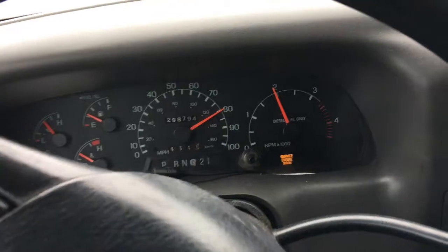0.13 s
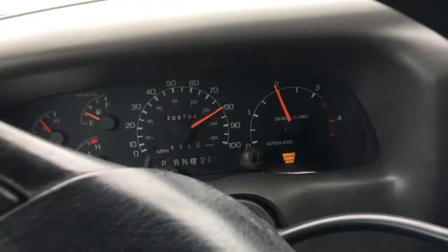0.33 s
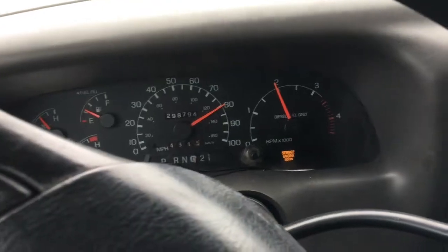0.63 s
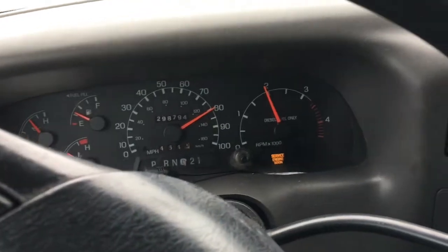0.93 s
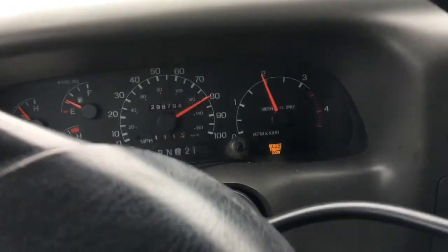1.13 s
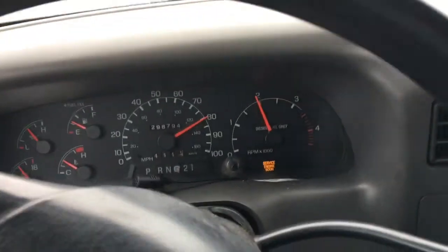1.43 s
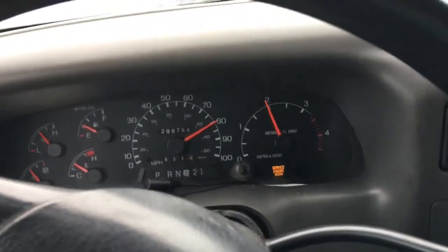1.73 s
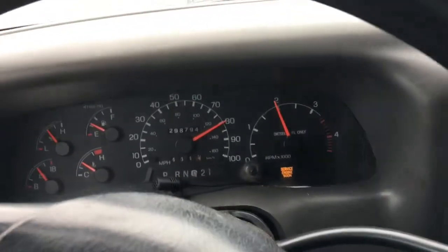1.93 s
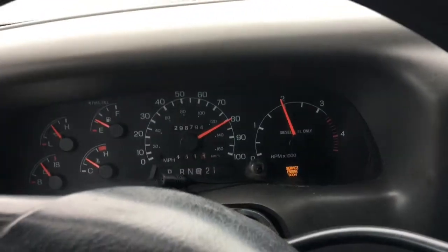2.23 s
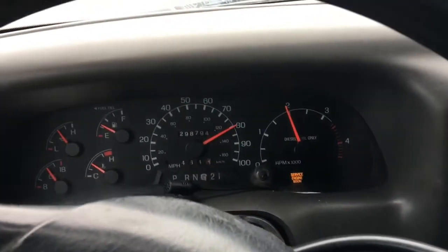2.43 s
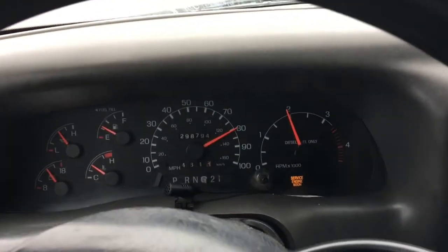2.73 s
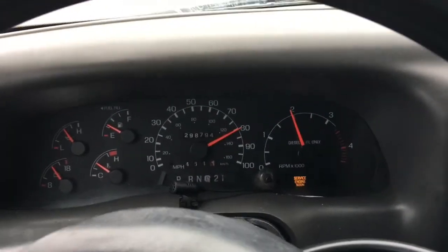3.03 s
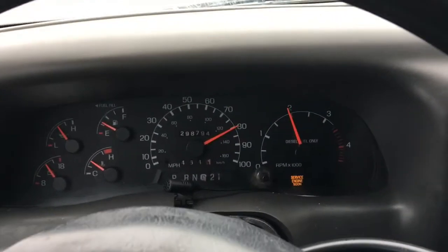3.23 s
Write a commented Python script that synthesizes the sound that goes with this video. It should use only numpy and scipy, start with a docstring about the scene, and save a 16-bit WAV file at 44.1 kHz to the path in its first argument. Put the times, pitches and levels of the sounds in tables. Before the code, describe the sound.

Turbocharger surge flutters in quick hooting puffs over steady diesel engine and road roar in a cab

```python
"""Inside the cab of a diesel pickup at highway speed, heard by a small microphone near the dashboard.
After a short silence the level opens on engine and wheel tones over road roar, all sums of tones and shaped
noise; the intake hisses (noise) with a thin compressor whistle (a narrow noise band). After two seconds the
hiss weakens, the whistle swells and climbs, and load lifts the firing tone. Then the compressor surges:
puffs of noise flow back through the intake pipe, which hoots on a wandering tone and its octave."""
import sys
import numpy as np
from scipy import signal
from scipy.fft import rfft, irfft
from scipy.io import wavfile

SR = 44100
rng = np.random.default_rng(int(sys.argv[2]) if len(sys.argv) > 2 else 0)


def wav_record(signal):
    """Record a signal, one row per channel, as 16-bit PCM in the file named by sys.argv[1]."""
    frames = np.transpose(np.atleast_2d(signal))
    bounded = np.clip(frames, -1, 1)
    # unit amplitude maps onto the largest positive 16-bit level
    quanta = np.round(bounded * 32767).astype(np.int16)
    wavfile.write(sys.argv[1], SR, quanta)


def makeup_ratio(level_db):
    """Linear amplitude ratio for a level in decibels (20 dB per factor of ten)."""
    decades = np.asarray(level_db, float) / 20
    return 10 ** decades


N = 148617
TIME = np.arange(N) / SR
WHEEL_HZ = 12.388  # turns per second


def rms_one(x):
    """Scales a signal to rms 1."""
    return x / np.sqrt(np.mean(x ** 2) + 1e-20)


def in_time(rows):
    """Straight-line curves through the columns of a table whose first column is time."""
    s, *columns = np.transpose(rows)
    return [np.interp(TIME, s, c) for c in columns]


def drift(rate_hz):
    """Slow random wandering of spread 1: noise through two equal low-pass poles at rate_hz."""
    hop = 40  # samples between drawn values
    r = np.exp(-2 * hop * np.pi * rate_hz / SR)
    white = rng.standard_normal(N // hop + 2002)
    slow = signal.lfilter([1], [1, -2 * r, r * r], white)[2000:]  # drops the filter's start
    return np.interp(np.arange(N) / hop, np.arange(len(slow)), rms_one(slow - slow.mean()))


def coloured(spectrum):
    """Noise of rms 1 whose spectrum follows the table, joined along log frequency."""
    hz, db = np.transpose(spectrum)
    bins = np.maximum(np.fft.rfftfreq(N, 1 / SR), 1)
    gain = makeup_ratio(np.interp(np.log(bins), np.log(hz), db))
    return rms_one(irfft(rfft(rng.standard_normal(N)) * gain, N))


def narrow(cycles, pole_width_hz):
    """Noise band of rms 1 around a moving tone: two equal poles shape it, the tone's phase shifts it up."""
    r = np.exp(-np.pi * pole_width_hz / SR)
    white = rng.standard_normal(N) + 1j * rng.standard_normal(N)
    band = signal.lfilter([1], [1, -2 * r, r * r], white)
    return rms_one(np.real(band * np.exp(2j * np.pi * cycles)))


def rings(table):
    """Resonances as narrow bands of noise at fixed pitches."""
    return sum(makeup_ratio(db) * narrow(hz * TIME, width) for hz, width, db in table)


def tones(cycles, orders, waver_db, waver_rad):
    """Multiples of a turning rate, in step like a train of pushes: one shared phase sway, separate levels."""
    sway = waver_rad * drift(1.25) + rng.uniform(0, 2 * np.pi)
    parts = []
    for multiple, db in orders:
        level = np.sqrt(2) * makeup_ratio(db + waver_db * drift(1.6))
        parts.append(level * np.cos(multiple * (2 * np.pi * cycles + sway)))
    return parts


def wheels():
    """The turning wheels push the cab at multiples of their rate."""
    # tones of the turning wheels: (multiple of the wheel rate, level [dB rms])
    wheel_orders = [(3, -35.0), (4, -25.5), (6, -25.0), (7, -24.5), (15, -40.0), (16, -43.0), (17, -45.0),
                    (18, -47.0), (19, -49.0), (23, -50.0)]
    return sum(tones(WHEEL_HZ * TIME, wheel_orders, waver_db=2.1, waver_rad=0.055))


def road_roar():
    """Broad road and wind noise: the bass is lumpy, the rest flickers faster."""
    # colour of the roar in the cab: (frequency [Hz], relative level [dB per Hz])
    roar_colour = [(15, -36), (27, -31), (38, -10), (52, -2), (66, 0), (90, -7), (110, -6), (135, -3.5),
                   (180, -12), (250, -19.5), (340, -18.5), (480, -25.5), (600, -20.5), (770, -26.5),
                   (1230, -31), (1800, -33), (2400, -36.5), (3300, -41.5), (4200, -43), (5500, -41.5),
                   (7000, -44.5), (9000, -46), (11000, -52.5), (14000, -45.5), (16000, -40)]
    level_db, rumble_below_hz, lump_db, flicker_db = -18.5, 160, 1, 0.63
    roar = coloured(roar_colour)
    low_pass = signal.butter(2, rumble_below_hz, fs=SR, output="sos")
    bass = signal.sosfiltfilt(low_pass, roar)
    lumpy_bass = bass * makeup_ratio(lump_db * drift(2.7))
    flickering_rest = (roar - bass) * makeup_ratio(flicker_db * drift(12.0))
    return makeup_ratio(level_db) * (lumpy_bass + flickering_rest)


def drones():
    """Narrow noise bands, perhaps tyre tread and panels, and a tone that throbs once per wheel turn."""
    # noisy drones: (frequency [Hz], pole width [Hz], level [dB rms])
    drone_bands = [(659, 32, -39), (614, 28, -43.5), (847, 30, -47), (1258, 30, -56), (1628, 18, -52.5),
                   (2022, 34, -49.5), (2333, 46, -50.5), (2536, 45, -51), (3263, 64, -52.5)]
    # tone at the heart of the loudest drone: (frequency [Hz], pitch wander [Hz], mid-throb level [dB rms])
    hz, wander_hz, core_db = (657, 8.1, -35)
    throb_db = 4.5 * np.sin(2 * np.pi * WHEEL_HZ * TIME)
    cycles = np.cumsum(hz + wander_hz * drift(10.66)) / SR
    core = np.sqrt(2) * makeup_ratio(core_db + throb_db) * np.sin(2 * np.pi * cycles)
    return core + rings(drone_bands)


def engine(cycles, load_db):
    """Low orders of the eight-cylinder cycle; the firing tone grows with load."""
    # tones of the engine: (multiple of the cycle rate, level before load [dB rms])
    engine_orders = [(4, -20.5), (6, -24.5), (8, -24.5), (12, -43.0), (14, -47.0), (17, -50.0), (18, -42.0)]
    firing_order = 8
    parts = tones(cycles, engine_orders, waver_db=-0.1, waver_rad=0.067)
    mix = 0
    for part, (multiple, _) in zip(parts, engine_orders):
        mix = mix + (part * makeup_ratio(load_db) if multiple == firing_order else part)
    return mix


def intake_hiss(cycles):
    """Air drawn in hisses, swelling once per engine cycle and at random."""
    # strength of the hiss: (time [s], level [dB])
    hiss_curve = [(0, -37.5), (.45, -36), (.8, -35.5), (1.4, -35.5), (1.9, -35.5), (2.15, -37), (2.22, -41),
                  (2.4, -44.5), (3.37, -47.5)]
    # colour of the hiss: (frequency [Hz], relative level [dB])
    hiss_colour = [(1800, -20), (3000, -7), (3600, -9), (4300, -6.5), (4800, -6), (5800, -4), (6600, -1),
                   (7700, -3.5), (8900, 1), (10000, -6.5), (10800, -6.5), (12000, -4.5), (13000, -7),
                   (14500, -2), (15100, -5), (15700, -10), (16500, -14)]
    # faint intake resonances: (frequency [Hz], pole width [Hz], level over the hiss level [dB])
    intake_rings = [(4324, 31, -18.5), (5770, 55, -14), (6030, 48, -17), (7140, 64, -13.5), (8350, 50, -24),
                    (8700, 76, -15), (9700, 40, -17), (12100, 50, -25), (13500, 50, -25)]
    hiss_db, = in_time(hiss_curve)
    gulp_db = 1.42 * np.sin(2 * np.pi * cycles)
    flutter_db = 1.0 * drift(12.0)
    return makeup_ratio(hiss_db + gulp_db + flutter_db) * (coloured(hiss_colour) + rings(intake_rings))


def compressor_whistle():
    """The compressor whistles as a narrow noise band, wavering in pitch and level."""
    # path of the whistle: (time [s], frequency [Hz], level [dB rms])
    whistle_path = [(0, 14800, -50), (.7, 14600, -49), (1.0, 14820, -51), (1.5, 14720, -51),
                    (2.12, 14710, -48), (2.22, 14920, -41), (2.3, 15220, -39), (2.41, 15600, -41),
                    (2.5, 15900, -55), (3.37, 16000, -70)]
    wander_hz, fade_db = 60.5, 1
    hz, whistle_db = in_time(whistle_path)
    cycles = np.cumsum(hz + wander_hz * drift(7.9)) / SR
    return makeup_ratio(whistle_db + fade_db * drift(7.0)) * narrow(cycles, pole_width_hz=190)


def puff(start, length, sag_db_per_s):
    """Smooth rise, sagging hold, smooth fall; start and end are the midpoints of the two ramps."""
    half_rise_s, half_fall_s = 0.018, 0.021
    t = TIME - start
    rise = np.clip(t / half_rise_s / 2 + .5, 0, 1)
    fall = np.clip((length - t) / half_fall_s / 2 + .5, 0, 1)
    sag_db = -sag_db_per_s * np.clip(t - length / 2, -1, 1)
    return np.sin(np.pi / 2 * rise * fall) ** 2 * makeup_ratio(sag_db)


def puff_air(surges):
    """Air flowing back hisses in puffs, coloured by the pipe's resonances."""
    # colour of the puffs: (frequency [Hz], relative level [dB])
    puff_colour = [(600, -25), (900, -11), (1350, -4), (1900, -6), (2650, 2.5), (3200, 0.5), (4200, -2.5),
                   (5200, -3), (5800, 0), (6600, -2.5), (8000, -2.5), (10000, -3.5), (12000, -6),
                   (14000, -3), (16000, -19)]
    # pipe resonances: (frequency [Hz], pole width [Hz], level over the hiss level [dB])
    puff_rings = [(4090, 64, -15.5), (5860, 450, -10), (7330, 84, -18), (8850, 150, -12.5),
                  (10400, 92, -28), (11400, 100, -13), (12700, 120, -15.5), (14300, 150, -19)]
    flutter_db = 1.5
    air = sum(makeup_ratio(row[2]) * puff(row[0], row[1], sag_db_per_s=25) for row in surges)
    return air * makeup_ratio(flutter_db * drift(22.0)) * (coloured(puff_colour) + rings(puff_rings))


def pipe_hoots(surges):
    """A little after each puff starts, the pipe hoots on a rising pitch, with its octave and breath noise."""
    lag_s, sag_db_per_s, wander_hz, waver_db = 0.017, 14, 12, 2
    flat_hz, climb_s = 44.96, 0.029  # flatness at the puff's start, and its decay time
    breath_db, breath_width_hz = -38, 59  # the breath does not follow the hoot's level: weak hoots are ragged
    wander = wander_hz * drift(26.2)
    wavers = [waver_db * drift(30.0) for _ in range(2)]
    out = 0
    for start, length, _, hoot_db, hz, octave_db in surges:
        flatness = flat_hz * np.exp(-np.maximum(TIME - start, 0) / climb_s)
        cycles = np.cumsum(hz + wander - flatness) / SR
        hoot = 0
        for k, partial_db, waver in zip((1, 2), (0, octave_db), wavers):
            tone = np.sqrt(2) * makeup_ratio(hoot_db + waver) * np.sin(2 * np.pi * k * cycles)
            breath = makeup_ratio(breath_db) * narrow(k * cycles, k * breath_width_hz)
            hoot = hoot + makeup_ratio(partial_db) * (tone + breath)
        out = out + puff(start + lag_s, length - lag_s, sag_db_per_s) * hoot
    return out


def surge():
    """The surging compressor lets air back: each puff hisses and makes the pipe hoot."""
    # the puffs: (start [s], length [s], hiss level [dB], hoot level [dB], hoot pitch [Hz],
    # octave level over the hoot [dB])
    surges = [(2.463, 0.035, -34.5, -37, 1335, -3), (2.563, 0.057, -34.5, -40.5, 1350, -2.5),
              (2.676, 0.049, -30.5, -40, 1320, 1.5), (2.774, 0.064, -33, -35.5, 1325, -2),
              (2.882, 0.055, -31.5, -35.5, 1338, 1.5), (2.995, 0.16, -32.5, -32, 1347, -3.5),
              (3.181, 0.064, -30.5, -29.5, 1347, -5), (3.288, 0.075, -31, -30.5, 1339, -2.5)]
    return puff_air(surges) + pipe_hoots(surges)


def scene():
    """Sums the road, engine, intake and surge; engine and intake hiss share one cycle."""
    # engine run: (time [s], cycle rate [Hz], extra level of the firing tone under load [dB])
    engine_run = [(0, 16.61, 0), (2.3, 16.61, 1), (2.6, 16.57, 5), (3.37, 16.56, 6)]
    cycle_hz, load_db = in_time(engine_run)
    cycles = np.cumsum(cycle_hz) / SR
    road = wheels() + road_roar() + drones()
    intake = intake_hiss(cycles) + compressor_whistle()
    return (road + engine(cycles, load_db) + intake + surge())[None]


def top_cut(x):
    """Nothing passes above the cut-off."""
    return signal.sosfilt(signal.butter(12, 16760, fs=SR, output="sos"), x)


def record(dry):
    """The microphone dips in the low treble, the top is cut, and the level opens from silence."""
    dip_hz, dip_width_hz, dip_depth = 4810, 380, 0.59  # depth: share taken away at the centre
    start_s, open_s, settle_s, settle_db = .1538, 0.0011, 0.016, 2.5
    peak = signal.iirpeak(dip_hz, dip_hz / dip_width_hz, SR)
    heard = dry - dip_depth * signal.lfilter(*peak, dry)
    low_pass = signal.ellip(12, .5, 70, 15740, fs=SR, output="sos")  # ripple dB, stop dB, edge Hz
    heard = signal.sosfilt(low_pass, heard)
    # opens quickly, a little low, and settles
    since = np.maximum(TIME - start_s, 0)
    opening = np.minimum(since / open_s, 1)
    settling = makeup_ratio(-settle_db * np.exp(-since / settle_s))
    return top_cut(heard * opening * settling)


dry = scene()
out = record(dry)
wav_record(out)
```